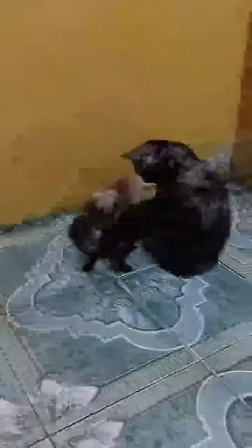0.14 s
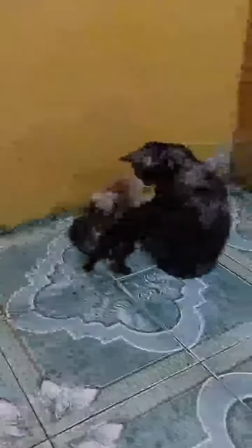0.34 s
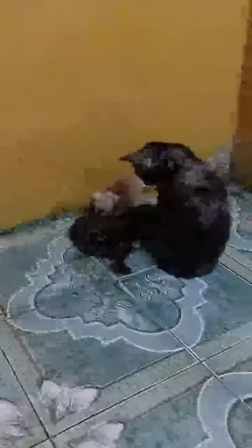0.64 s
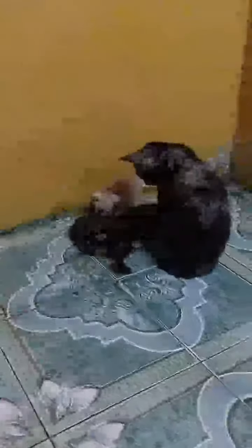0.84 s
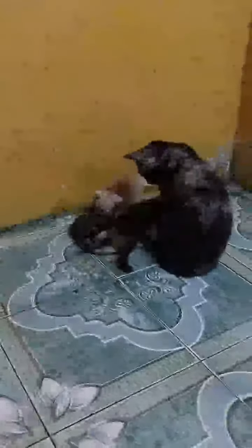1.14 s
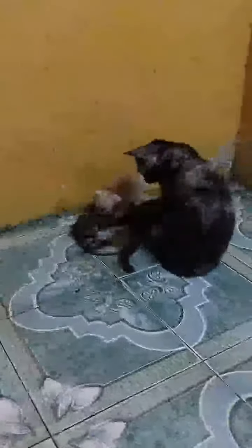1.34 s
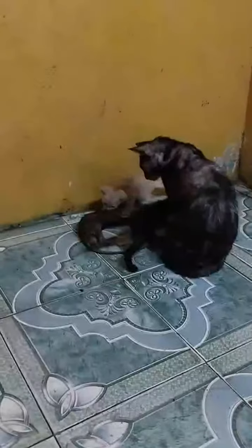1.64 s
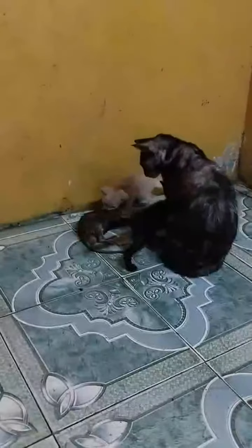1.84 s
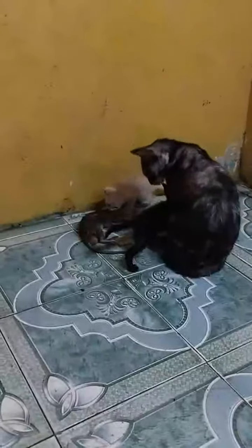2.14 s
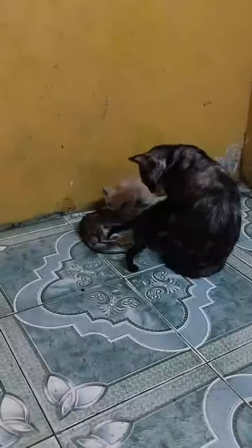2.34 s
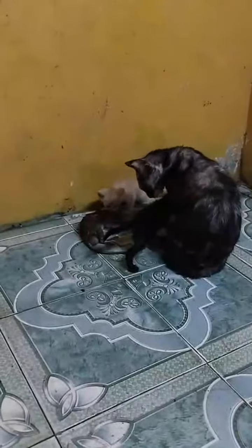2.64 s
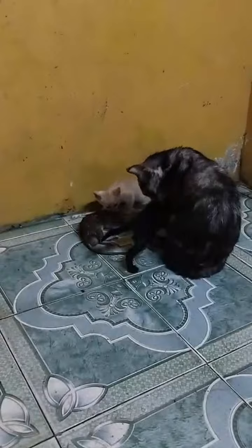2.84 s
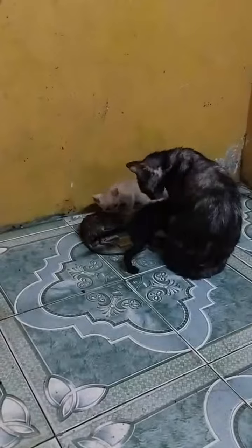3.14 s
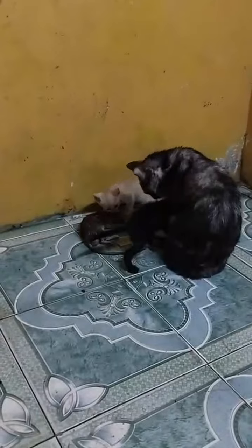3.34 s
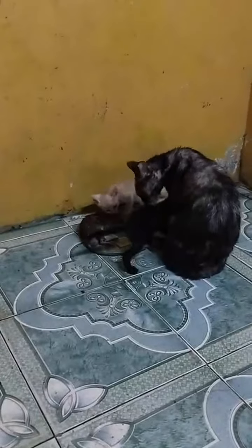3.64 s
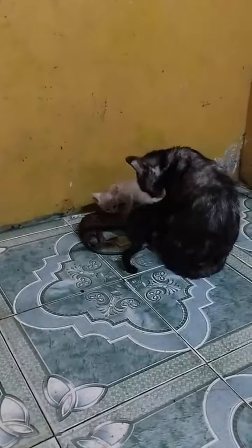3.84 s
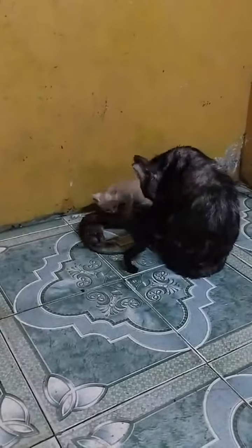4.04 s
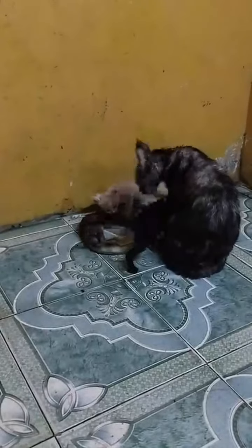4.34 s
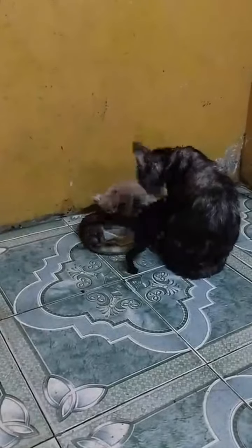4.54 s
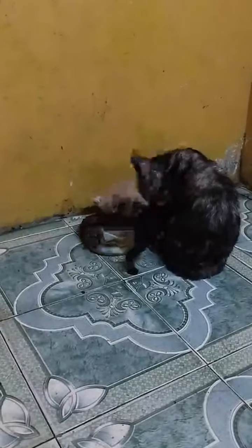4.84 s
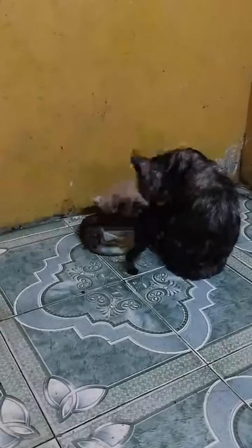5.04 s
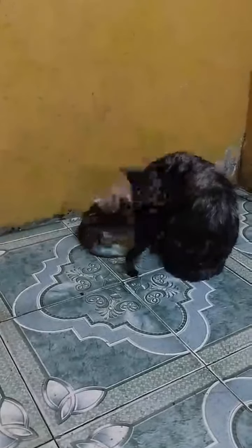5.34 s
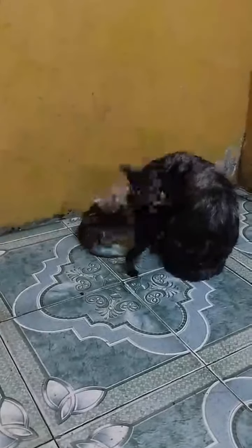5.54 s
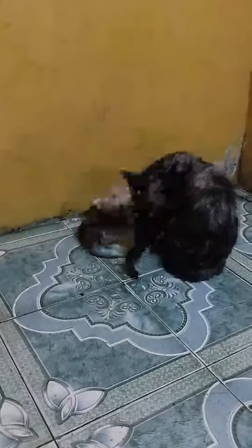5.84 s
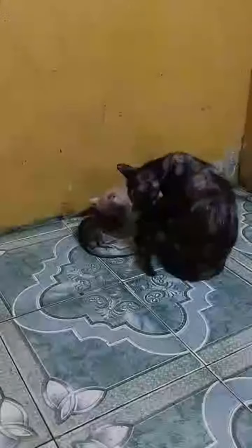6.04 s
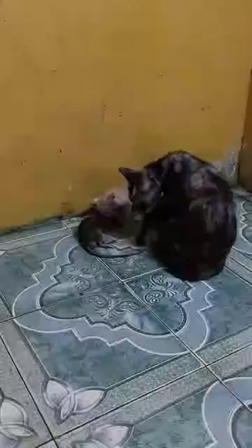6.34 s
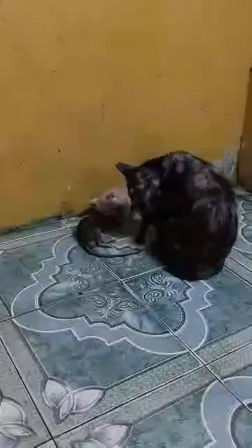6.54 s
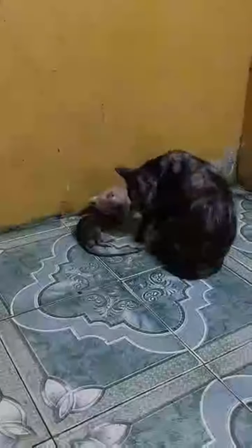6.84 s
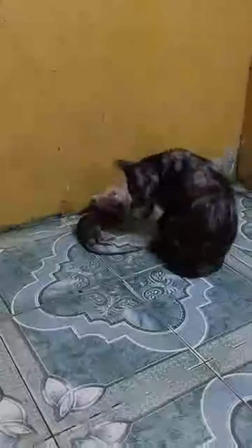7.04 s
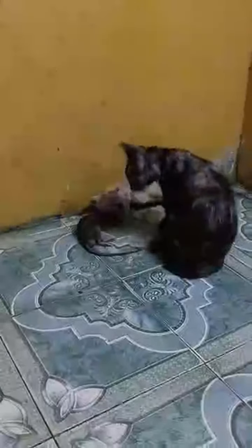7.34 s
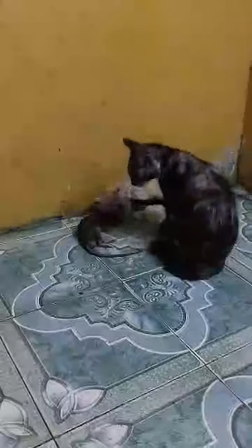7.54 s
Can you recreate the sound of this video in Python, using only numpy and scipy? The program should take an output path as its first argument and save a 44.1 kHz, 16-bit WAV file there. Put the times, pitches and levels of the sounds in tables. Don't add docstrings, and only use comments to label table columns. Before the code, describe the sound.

Low appliance hum and throbbing fan with soft handling thuds, a sharp claw click on tile, two piercing rodent squeaks, hoarse squeals, then a faint mew.

```python
import sys
import numpy as np
from scipy import signal
from scipy.fft import rfft, irfft
from scipy.io import wavfile
from scipy.ndimage import uniform_filter1d

SR = 44100
rng = np.random.default_rng(int(sys.argv[2]) if len(sys.argv) > 2 else 0)


def nominal_scale(level):
    x = np.asarray(level, float) / 20
    return 10 ** x


def to_wav(s):
    ch = np.atleast_2d(s).T
    pcm = np.round(np.clip(ch, -1, 1) * 32767)
    wavfile.write(sys.argv[1], SR, pcm.astype(np.int16))


N = 338688
T = np.arange(N) / SR

# time_s, pitch_hz, level_db
SQUEAKS = [
    [(3.694, 2310, -42), (3.701, 2170, -21), (3.708, 2112, -24), (3.72, 2165, -20.5), (3.74, 2186, -16.5),
     (3.762, 2218, -14), (3.774, 2270, -16.5), (3.7785, 2250, -22)],
    [(3.957, 2300, -33), (3.962, 2225, -17), (3.97, 2178, -14.5), (3.988, 2215, -15), (4.009, 2225, -11),
     (4.029, 2236, -11.5), (4.0405, 2280, -21), (4.0505, 2268, -12.5), (4.057, 2300, -21)],
]
# time_s, pitch_hz, level_db
GULPS = [
    [(3.693, 740, -49.5), (3.697, 775, -25), (3.702, 593, -40), (3.705, 660, -18.5), (3.712, 587, -21.5),
     (3.717, 593, -27.5), (3.723, 590, -52)],
    [(3.676, 1910, -50), (3.684, 1550, -48), (3.691, 1260, -41)],
    [(3.944, 2015, -38.5), (3.95, 1760, -31.5), (3.955, 1396, -31.5), (3.96, 1140, -29.5)],
]
# start_s, hold_ms, from_hz, to_hz, level_db
CHIRPS = [
    [(3.7812, 1, 2470, 2460, -20), (3.7845, 2.2, 2300, 2400, -26), (3.7905, .6, 2650, 2600, -22),
     (3.7925, 7.5, 2370, 2400, -14.5), (3.8015, 1.5, 2470, 2450, -11), (3.8055, 3.5, 2560, 2630, -14.5),
     (3.8175, 3.5, 2450, 2190, -23.5), (3.8232, .8, 2470, 2400, -26), (3.8265, 4.5, 2360, 2420, -29),
     (3.8365, 1.5, 2430, 2410, -25), (3.842, 2.2, 2390, 2370, -26), (3.8475, 2.2, 2370, 2380, -29),
     (3.860, 2.2, 2480, 2440, -28), (3.872, 4.5, 2240, 2250, -31)],
    [(4.060, 1.8, 2480, 2570, -18), (4.0643, .6, 2420, 2400, -21), (4.0675, 2.5, 2850, 2680, -21),
     (4.072, 1.5, 2570, 2460, -13), (4.0745, 2.2, 2390, 2390, -15.5), (4.0778, 4.7, 2410, 2510, -12),
     (4.0855, 3.5, 2560, 2690, -13), (4.0987, .7, 2500, 2480, -22), (4.1032, 1.2, 2400, 2380, -25),
     (4.112, 2.2, 2360, 2370, -28), (4.1185, 1.5, 2470, 2480, -29), (4.124, 2.2, 2460, 2440, -27),
     (4.136, 2.2, 2330, 2320, -29), (4.157, 2.5, 2340, 2370, -30)],
]
# start_s, length_s, pitch_hz, peak_db, breath_db
AFTERGLOWS = [
    (3.806, 0.16, 2340, -26, -46),
    (4.096, .16, 2420, -30.5, -67),
]

# time_s, octave_hz, voice_db, airflow_db
RISING_SQUEALS = [
    [(3.97, 4540, -64, -57), (4.02, 4580, -50, -47.5), (4.065, 4670, -30.5, -48.5), (4.1, 4740, -34, -55),
     (4.14, 4730, -34.5, -52), (4.19, 4840, -37, -52), (4.24, 4720, -48, -55.5), (4.33, 4850, -55, -65)],
    [(4.34, 4515, -74, -64), (4.42, 4520, -64, -53), (4.462, 4610, -47, -53), (4.49, 4780, -38, -55),
     (4.53, 4870, -48, -50), (4.565, 4420, -45, -47), (4.66, 4570, -53, -57), (4.74, 4540, -67, -71)],
]
# share_of_length, octave_hz, voice_db, airflow_db
DROP_SHAPE = [(0, 5180, -42, -22), (.035, 5050, -20, -6), (.065, 4887, -15, -1), (0.136, 4640, -6, 0.5),
              (.22, 4643, -1, -3), (.3, 4560, -5.5, -0.5), (.39, 4486, -10, -1.5), (.52, 4590, -7, -0.5),
              (.7, 4550, -19, -8.5), (1, 4530, -40, -27)]
# start_s, length_s, voice_db, airflow_db, staying_power_db
DROPPING_SQUEALS = [
    (4.754, 0.4, -29, -49.5, -2.5),
    (5.153, 0.35, -30.5, -47, -3),
    (5.538, 0.38, -28.5, -48, 0.5),
]
# start_s, length_s, from_hz, to_hz, peak_db
STREAKS = [(4.36, 0.067, 3300, 3900, -56), (4.375, .04, 5000, 5500, -57),
           (4.45, 0.08, 4620, 4840, -43), (4.505, 0.071, 5100, 5320, -51),
           (4.545, .035, 3650, 3720, -47), (4.795, 0.059, 7000, 6650, -46),
           (4.865, 0.058, 3500, 3970, -41), (4.925, 0.07, 4030, 4220, -37),
           (4.94, 0.0306, 5130, 4940, -38), (5.195, 0.047, 4980, 4940, -36.5),
           (5.21, 0.057, 4380, 4330, -40), (5.553, 0.048, 4920, 4750, -39.5),
           (5.58, 0.08, 4670, 4560, -39), (5.66, .06, 4560, 4500, -41), (4.8, .09, 4720, 4530, -38),
           (5.56, 0.106, 5650, 5360, -47), (5.21, .05, 6600, 6700, -49),
           (3.962, .03, 5450, 5580, -42), (4.075, 0.0099, 4800, 4500, -29.5),
           (3.692, .012, 4500, 4250, -42), (5.32, .065, 4400, 4240, -46),
           (5.635, 0.054, 2540, 2940, -43), (5.68, 0.049, 3600, 3730, -41),
           (5.73, .045, 5050, 5000, -44), (3.772, .013, 4700, 5000, -36),
           (3.817, 0.0089, 4500, 4300, -40)]
# start_s, length_s, from_hz, to_hz, peak_db
MOUTH = [(3.772, 0.042, 5200, 6000, -43.5), (3.94, 0.022, 3500, 3840, -45.5), (4.0, 0.12, 4500, 5420, -40),
         (4.49, 0.098, 5550, 6300, -42), (5.3, 0.15, 6230, 6900, -53), (5.62, .14, 6630, 6900, -52),
         (4.4, .12, 6340, 7300, -58), (4.08, .2, 4730, 5480, -43), (4.36, 0.36, 3400, 6020, -46.5),
         (4.47, 0.26, 3030, 4050, -51), (4.76, 0.067, 5470, 4880, -40.5), (4.86, .17, 3500, 4330, -40),
         (4.87, .12, 2800, 3300, -44), (4.98, .13, 4540, 4780, -45), (4.93, 0.084, 4760, 4750, -41),
         (5.16, 0.12, 5400, 4840, -44), (5.22, .24, 2766, 4090, -44), (5.545, 0.17, 5630, 4960, -49),
         (5.655, 0.19, 2910, 4300, -43.5), (5.71, 0.15, 4760, 4550, -46), (3.775, 0.048, 2920, 3100, -44.5),
         (5.36, 0.154, 3300, 3400, -59), (5.37, 0.1, 4490, 4400, -55), (5.82, .13, 3580, 4200, -56)]
# frequency_hz, level_db (per Hz)
BREATH_COLOUR = [(1500, -27), (2400, 4), (3500, -8), (4600, 1), (5800, -4), (6900, -4), (8000, -10),
                 (9000, -43)]

# time_s, pitch_hz
MEW_PITCH = [(6.28, 996), (6.31, 1054), (6.335, 1074), (6.4, 1075), (6.5, 1067), (6.56, 1068),
             (6.585, 1045), (6.66, 1038)]
MEW_ORDERS = (4, 5, 6, 1, 2, 9, 11, 3)
# start_s, full_s, fade_s, gone_s, level_db
MEW_PARTIALS = [
    (6.295, 6.39, 6.465, 6.7, -46),
    (6.295, 6.39, 6.44, 6.74, -51),
    (6.265, 6.335, 6.4, 6.53, -50),
    (6.1, 6.43, 6.55, 6.9, -57),
]
# time_s, change_db
MEW_CATCHES = [(6.37, -12), (6.478, -7), (6.51, -11), (6.54, -3), (6.585, -5)]
# start_s, length_s, from_hz, to_hz, peak_db
MEW_END = [
    (6.66, 0.067, 1057, 985, -49),
]

# time_s, peak_db, start_hz, rise_ms, fall_ms
TICKS = [
    (3.5445, -23, 2570, 1.4, 1.3),
    (3.5483, -6.5, 2460, 1.6, 1.35),
    (3.5535, -24.5, 2200, 0.67, 1.7),
    (3.638, -35, 1800, .5, .8),
    (3.7778, -18.5, 1560, 0.87, 0.65),
    (4.0568, -15.5, 1510, .7, .6),
]
# frequency_hz, level_db (per Hz)
SNAP_COLOUR = [(700, -13), (1300, 1), (3700, -8), (6000, -12), (8000, -36)]
# time_s, level_db
SCUFF = [(3.638, -38), (3.645, -42), (3.662, -38.5), (3.675, -44), (3.691, -44)]
# frequency_hz, level_db (per Hz)
SCUFF_COLOUR = [(600, -18), (1500, -5.0), (2300, 2.0), (3200, -6.0), (4400, -9.5), (5500, -16)]
# time_s, peak_db, pitch_hz, fall_ms
BUMPS = [(0.469, -32, 61.9, 14.0), (1.677, -35, 91, 16), (1.74, -24, 67.3, 10), (1.767, -26, 74, 10),
         (1.826, -27, 58.3, 14), (1.857, -31, 76, 14.0), (2.158, -30, 78.1, 17), (2.379, -23.5, 79, 6.3),
         (3.399, -31, 64, 14.0), (0.28, -39, 55, 16), (3.77, -38, 50, 18), (6.3, -41, 55, 16),
         (6.099, -32, 72.7, 16)]
# time_s, frequency_hz, level_db
RUSTLE = [
    [(5.963, 590, -40), (5.978, 650, -43), (6.0, 454, -53), (6.04, 448.3, -65)],
    [(5.36, 720, -58), (5.5, 698, -55), (5.72, 678, -52)],
    [(6.27, 451, -56), (6.33, 498, -55), (6.4, 700, -52), (6.47, 498, -59)],
    [(5.0, 800, -56), (5.1, 701, -53), (5.33, 794, -59)],
]
# time_s, change_db
HAND_STILL = [(0, 0.5), (4.2, -2), (4.5, 0), (5.8, -2), (6.0, 0.5), (7.68, 0)]

# pitch_hz, level_db
HUM = [
    (120.1, -41.5),
    (61, -60.5),
]
# start_s, length_s, from_hz, to_hz, peak_db
DRONES = [(3.55, 0.47, 169.2, 168.6, -50), (4.38, 0.29, 193, 185, -53), (5.22, 0.23, 165, 167, -49),
          (6.85, 0.33, 383, 361, -55), (7.25, 0.14, 453, 457, -53), (6.29, .1, 451, 455, -51),
          (6.77, .06, 508, 505, -56), (7.15, 0.054, 372, 376, -50)]
# time_s,
# change_db
LULLS = [(0.17, 1), (0.36, 0), (0.55, -3), (0.72, -1.5), (0.96, -2), (1.21, -2.5), (1.47, -5.5), (1.68, -3),
         (1.87, -2.5), (2.03, -4.5), (2.25, -3.5), (2.45, -2.5), (2.65, -3.5), (2.83, -6), (3.07, -4),
         (3.28, -0.5), (3.62, 2.5), (3.74, 9), (5.91, 3), (6.24, -2), (6.59, 1.5), (6.81, -6.5),
         (7.02, -2.5), (7.22, -3), (7.39, -5.5), (7.58, -5.5), (7.67, -1)]
# time_s, change_db
FAN_LOAD = [(0, -0.5), (1.1, 0.5), (1.5, -1), (2.3, -1.5), (3.2, 2.5), (3.6, -6), (5.1, -2.5), (6, -3.5),
            (6.3, 1.5), (6.5, 2.2), (6.62, -6), (6.69, 3.5), (7, 0), (7.68, 2.5)]
# time_s, level_db
AIR_LEVEL = [(0.0, -45), (4.1, -44.5), (5.9, -44.5), (6.1, -46.5), (6.35, -44), (6.7, -45), (6.9, -46),
             (7.68, -47.5)]
# frequency_hz, level_db (per Hz)
AIR_COLOUR = [(88, -43), (150, -3.5), (206, -3), (243, -1), (339, -4.5), (368, -1.5), (465, -7.5),
              (505, -5.5), (753, -10), (875, -9), (1260, -11), (2370, -9.5), (2950, -16.5), (4390, -21.5),
              (8000, -27.5), (10400, -82), (17600, -120)]
# frequency_hz, level_db (per Hz)
RUMBLE_COLOUR = [(25, -29), (45, -13.5), (60, -12), (90, -10.5), (150, -11), (220, -23)]
# frequency_hz, level_db (per Hz)
HISS_COLOUR = [(4120, -7), (7000, -0.5), (7670, -17), (8330, -3.5), (8950, -10), (10200, -6.5),
               (11750, -13), (12050, -4.5), (15100, -6), (15800, -7)]

# low_hz, high_hz
THINNED_HZ = (8300, 11900)
# start_s, end_s
DROPOUT_S = (5.9422, 5.962)


def squeaks():
    half_db, half_follows, octave_db, octave_late_s = -22.5, 0.46, -18, 0.0053
    out = np.zeros(N)
    for rows in SQUEAKS:
        i, gate, (hz, db) = columns(rows)
        since = T[i] - rows[0][0]
        late = np.clip(since / octave_late_s - 0.5, 0, 1) * nominal_scale(np.minimum(90 * since - 4.5, 0))
        half = nominal_scale(half_db + half_follows * db)
        out[i] += gate * whistle(hz, nominal_scale(db), half, late * nominal_scale(db + octave_db))
    return out + chirps() + glides(GULPS, 100, rough=0.053, fade_s=0.0019)


def chirps():
    rise_db_per_ms, fall_db_per_ms, tail_s, octave_db = 8, 13, 0.0043, -21
    out = np.zeros(N)
    for rows in CHIRPS:
        pitch = []
        for s, hold_ms, from_hz, to_hz, _ in rows:
            pitch += [(s, from_hz), (s + hold_ms / 1e3, to_hz)]
        last_s, last_hz = pitch[-1]
        i, gate, (hz,) = columns(pitch + [(last_s + tail_s, last_hz)], fade_s=0.002)
        levels = []
        for s, hold_ms, _, _, top_db in rows:
            ms = (T[i] - s) * 1e3
            fall = np.maximum(fall_db_per_ms * (ms - hold_ms), 0)
            rise = np.maximum(-rise_db_per_ms * ms, 0)
            levels.append(top_db - fall - rise)
        db = uniform_filter1d(np.max(levels, axis=0), size=40)
        out[i] += gate * whistle(hz, nominal_scale(db), 0, nominal_scale(db + octave_db))
    return out


def whistle(hz, main, half, octave):
    phase = 2 * np.pi * np.cumsum(hz) / SR
    odd = np.sin(phase / 2) + nominal_scale(-29) * smeared(5 * phase / 2, 150, rough=0.25)
    past_port_db = -np.maximum(2 * hz - 4850, 0) / 35
    upper = nominal_scale(past_port_db) * smeared(2 * phase, 350, rough=0.1)
    upper = upper + nominal_scale(-24) * smeared(3 * phase, 400, rough=0.8)
    rasp = main * nominal_scale(-34.5) * smeared(1.1 * phase, 2500, rough=1)
    return np.sqrt(2) * (main * np.sin(phase) + half * odd) + octave * upper + rasp


def squeals():
    low_offset_db, low_sinks_db_per_s = -4.5, 45
    breath_opens_s, breath_gains_db = 0.15, 9
    hoarse_after_s = 0.15
    out = np.zeros(N)
    breath = patchy(coloured(BREATH_COLOUR), flicker_db=3.5, rate_hz=30)
    hiss = coloured(HISS_COLOUR)
    for rows in RISING_SQUEALS + dropping_squeals():
        i, gate, (octave_hz, octave_db, flow_db) = columns(rows, fade_s=0.006)
        since = T[i] - rows[0][0]
        low_db = octave_db + low_offset_db - low_sinks_db_per_s * np.minimum(since, 0.2)
        breath_db = flow_db + breath_gains_db * np.clip(since / breath_opens_s, 0, 1) ** 1.5
        phase = np.pi * np.cumsum(octave_hz) / SR
        hoarse = 0.38 + 0.42 * since / hoarse_after_s
        voice = nominal_scale(low_db) * smeared(phase, 510, rough=0.53)
        voice += nominal_scale(octave_db - 2.0) * smeared(2 * phase, 490, rough=hoarse)
        upper = nominal_scale(-23.0) * smeared(3 * phase, 500, rough=0.74)
        upper += nominal_scale(-25.5) * smeared(4 * phase, 700, rough=0.95)
        upper += nominal_scale(-21.5) * smeared(5 * phase, 800, rough=1.0)
        air = nominal_scale(breath_db) * breath[i] + nominal_scale(flow_db) * hiss[i]
        out[i] += gate * (voice + nominal_scale(octave_db) * upper + air)
    streaks = arcs(STREAKS, full=0.24, fades=0.94, edge_db=-17, bend=1.2)
    mouth = arcs(MOUTH, full=0.33, fades=0.66, edge_db=-13.5, bend=0.54)
    out += glides(streaks, 450, rough=0.62, fade_s=0.008)
    out += glides(mouth, 1200, rough=0.99, fade_s=0.01)
    return out + afterglows(breath, hiss)


def dropping_squeals():
    calls = []
    for s, long, voice_db, flow_db, stay_db in DROPPING_SQUEALS:
        calls.append([(s + u * long, hz, voice_db + a + stay_db * min(u / 0.34, 1) ** 2, flow_db + b)
                      for u, hz, a, b in DROP_SHAPE])
    return calls


def afterglows(breath, hiss):
    rise_s, fall_db_per_s = 0.0047, 193
    out = np.zeros(N)
    for s, long, hz, db, breath_db in AFTERGLOWS:
        swell = [(s, -11), (s + rise_s, 0), (s + long, -fall_db_per_s * long)]
        i, gate, (less_db,) = columns(swell, fade_s=0.006)
        phase = 2 * np.pi * hz * T[i]
        rattle = smeared(phase, 510, rough=1.0) + nominal_scale(-17.5) * smeared(2 * phase, 420, rough=0.8)
        air = nominal_scale(breath_db + 0.49 * less_db) * breath[i] + nominal_scale(breath_db - 16.0) * hiss[i]
        out[i] += gate * (nominal_scale(db + less_db) * rattle + air)
    return out


def mew():
    edge_db, fourth_ends_s = -13, 6.58
    i, gate, (hz,) = columns(MEW_PITCH, fade_s=0.009)
    phase = 2 * np.pi * np.cumsum(hz) / SR
    catch_db = sum(db * np.exp(-((T[i] - s) / 0.011) ** 2) for s, db in MEW_CATCHES)
    swell_db = (2 * edge_db, edge_db, 0, 0, edge_db, 2 * edge_db)
    lifted = []
    for *times, db in MEW_PARTIALS:
        corners = [times[0] - 0.01, *times, times[-1] + 0.02]
        lifted.append(db + catch_db + np.interp(T[i], corners, swell_db))
    db4, db5, db6, db1 = lifted
    db4 = db4 - np.clip((T[i] - fourth_ends_s) * 800, 0, 20)
    levels_db = [db4, db5, db6, db1, db4 - 12, db5 - 22, db4 - 20, db5 - 10]
    last_note = arcs(MEW_END, full=0.49, fades=0.55, edge_db=-9, bend=1)
    out = glides(last_note, 60, rough=0.12, fade_s=0.0094)
    for k, db in zip(MEW_ORDERS, levels_db):
        out[i] += gate * nominal_scale(db) * smeared(k * phase, 160, rough=0.38)
    return out


def knocks(rows, sag, octave_db):
    out, t = np.zeros(N), np.arange(SR // 8) / SR
    for s, db, hz, rise_ms, fall_ms in rows:
        rise = np.sin(np.pi / 2 * t * 1e3 / rise_ms)
        fall = np.exp((rise_ms - t * 1e3) / fall_ms)
        shape = np.where(t < rise_ms / 1e3, rise, fall)
        phase = 2 * np.pi * hz * t * (1 - sag * t)
        ring = np.sin(phase) + nominal_scale(octave_db) * shape * np.sin(2 * phase)
        k = int(s * SR)
        out[k:k + len(t)] += nominal_scale(db) * shape * ring
    return out


def snap():
    time_s, level_db, fall_ms = 3.549, -35, 1
    return nominal_scale(level_db) * np.exp(-((T - time_s) * 1e3 / fall_ms) ** 2) * coloured(SNAP_COLOUR)


def scuff():
    i, gate, (db,) = columns(SCUFF, fade_s=0.0015)
    out = np.zeros(N)
    out[i] = gate * nominal_scale(db) * coloured(SCUFF_COLOUR)[i]
    return out


def hand_bumps():
    rows = [(s - 0.006, db, hz, 7.0, fall_ms) for s, db, hz, fall_ms in BUMPS]
    return knocks(rows, sag=1.6, octave_db=-10.0)


def corner(x):
    t60_s, level_db, gap_s = 0.39, -22, 0.043
    t = np.arange(SR // 2) / SR
    tail = rng.standard_normal(len(t)) * np.exp(-np.log(1000) * t / t60_s) * (t > gap_s)
    tail = signal.sosfilt(signal.butter(2, 1700, "highpass", fs=SR, output="sos"), tail)
    return x + nominal_scale(level_db) * signal.fftconvolve(x, tail / np.sqrt(np.sum(tail ** 2)))[:N]


def background():
    lull_db = throb(0.056)
    hum = sum(nominal_scale(db) * smeared(2 * np.pi * hz * T, 27, rough=0.035) for hz, db in HUM)
    rumble = nominal_scale(-51 + curve(HAND_STILL) + 0.88 * wobble(8, count=N)) * coloured(RUMBLE_COLOUR)

    air = patchy(coloured(AIR_COLOUR), flicker_db=1.49, rate_hz=20.0)
    air = nominal_scale(curve(AIR_LEVEL) - 0.5) * above(air, 1510, nominal_scale(0.64 * lull_db))

    port_db = -51 + curve(FAN_LOAD) + 1.2 * lull_db + 3.1 * wobble(34, count=N)
    port = nominal_scale(port_db) * smeared(2 * np.pi * 2300 * T, 720, rough=0.99)
    octave_db = -61.0 + 0.74 * lull_db + 2.4 * wobble(14, count=N)
    port_octave = nominal_scale(octave_db) * smeared(2 * np.pi * 4450 * T, 990, rough=0.89)

    hiss_top = nominal_scale(0.31 * lull_db + 0.91 * wobble(20, count=N))
    hiss_db = -61 + 0.25 * curve(FAN_LOAD) + 0.62 * lull_db
    hiss = nominal_scale(hiss_db) * above(coloured(HISS_COLOUR), 11500, hiss_top)

    drones = arcs(DRONES, full=0.26, fades=0.91, edge_db=-12.0, bend=1.0)
    motor = glides(drones, 25.2, rough=0.087, fade_s=0.03)
    rustle = glides(RUSTLE, 1400, rough=0.8, fade_s=0.00183)
    return hum + rumble + air + port + port_octave + hiss + motor + rustle


def throb(width_s):
    out = np.zeros(N)
    for s, db in LULLS:
        i = slice(int(s * SR) - SR // 8, int(s * SR) + SR // 8)
        out[i] += db * np.exp(-((T[i] - s) / width_s) ** 2)
    return out


def columns(rows, fade_s=0.0029):
    s, *cols = np.transpose(rows)
    i = slice(int((s[0] - fade_s) * SR), int((s[-1] + fade_s) * SR))
    gate = np.clip(np.minimum(T[i] - s[0], s[-1] - T[i]) / fade_s + 1, 0, 1)
    return i, gate, [np.interp(T[i], s, c) for c in cols]


def curve(rows):
    return np.interp(T, *np.transpose(rows))


def coloured(points):
    hz, db = np.transpose(points)
    f = np.maximum(np.fft.rfftfreq(N, 1 / SR), 1)
    gain = nominal_scale(np.interp(np.log(f), np.log(hz), db, left=-80, right=-80))
    x = irfft(rfft(rng.standard_normal(N)) * gain, N)
    return x / x.std()


def wobble(width_hz, count):
    k = max(int(SR / width_hz), 1)
    x = uniform_filter1d(uniform_filter1d(rng.standard_normal(count), k), k)
    return x * np.sqrt(3 * k / 2)


def smeared(phase, width_hz, rough):
    n, rough = len(phase), np.clip(rough, 0, 1)
    shake = (wobble(width_hz, count=n) + 1j * wobble(width_hz, count=n)) / np.sqrt(2)
    steady_and_rough = np.sqrt(1 - rough) + np.sqrt(rough) * shake
    return np.sqrt(2) * (steady_and_rough * np.exp(1j * phase)).imag


def glides(tables, width_hz, rough, fade_s):
    out = np.zeros(N)
    for rows in tables:
        i, gate, (hz, db) = columns(rows, fade_s)
        out[i] += gate * nominal_scale(db) * smeared(2 * np.pi * np.cumsum(hz) / SR, width_hz, rough)
    return out


def arcs(rows, full, fades, edge_db, bend):
    shape = ((0, edge_db), (full, 0), (fades, 0), (1, edge_db))
    return [[(s + u * long, a + (b - a) * u ** bend, db + less) for u, less in shape]
            for s, long, a, b, db in rows]


def patchy(x, flicker_db, rate_hz, count=16):
    place = np.log2(np.maximum(np.fft.rfftfreq(N, 1 / SR), 1) / 150) * count / 7
    place = np.clip(place, 0, count)
    lines = rfft(x)
    out = np.zeros(N)
    for k in range(count + 1):
        band = irfft(lines * np.clip(1 - abs(place - k), 0, 1), N)
        out += band * nominal_scale(flicker_db * wobble(rate_hz, count=N))
    return out


def above(x, hz, gain):
    high = irfft(rfft(x) * np.clip((np.fft.rfftfreq(N, 1 / SR) / hz - 1) * 10, 0, 1), N)
    return x + (gain - 1) * high


def mottled(x, depth_db, size=1024):
    f, _, z = signal.stft(x, SR, nperseg=size)
    chance = uniform_filter1d(rng.standard_normal(z.shape), size=3, axis=0)
    chance = uniform_filter1d(chance, size=2, axis=1)
    inside = (f > THINNED_HZ[0]) & (f < THINNED_HZ[1])
    change_db = depth_db * inside[:, None] * np.minimum(chance / chance.std(), 0.4)
    return signal.istft(z * nominal_scale(change_db), SR, nperseg=size)[1][:N]


def scene():
    ticks = knocks(TICKS, sag=15.0, octave_db=-23.0)
    near = corner(squeaks() + ticks + snap() + scuff())
    return (near + squeals() + mew() + hand_bumps() + background())[None]


def band_limit(x):
    return signal.sosfilt(signal.butter(12, 16680, fs=SR, output="sos"), x)


def record(dry):
    start, end = DROPOUT_S
    gate = np.clip(np.maximum((start - T) / 0.0003, (T - end) / 0.002), 0, 1)
    bass_cut = signal.butter(2, 42, "highpass", fs=SR, output="sos")
    mix = signal.sosfilt(bass_cut, mottled(dry[0], depth_db=10.0))[None] * gate
    return band_limit(mix)


dry = scene()
out = record(dry)
to_wav(out)
```